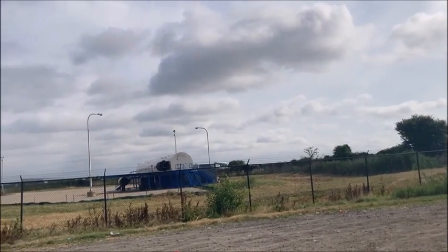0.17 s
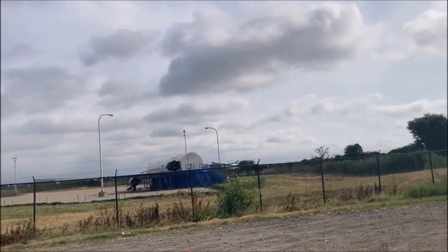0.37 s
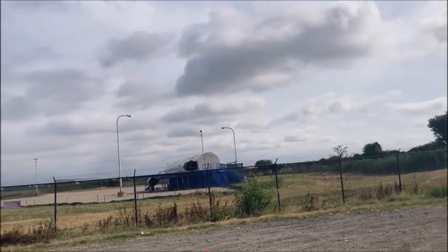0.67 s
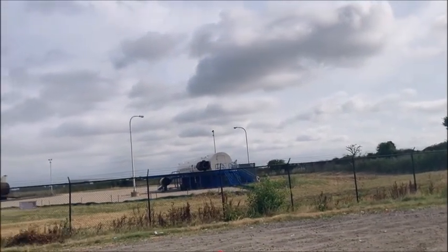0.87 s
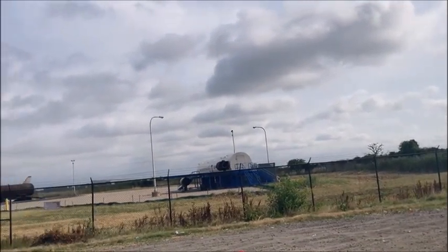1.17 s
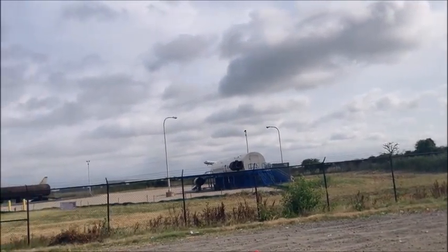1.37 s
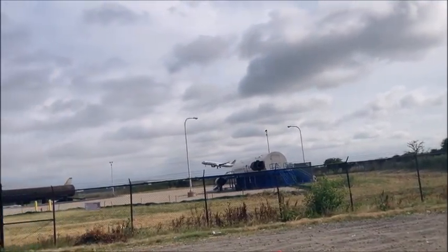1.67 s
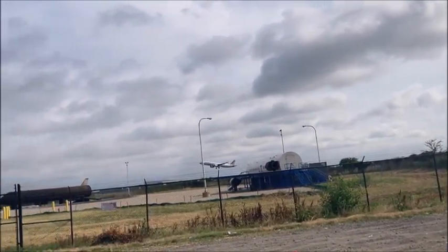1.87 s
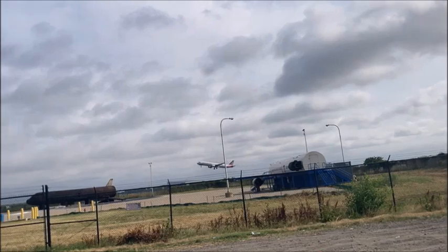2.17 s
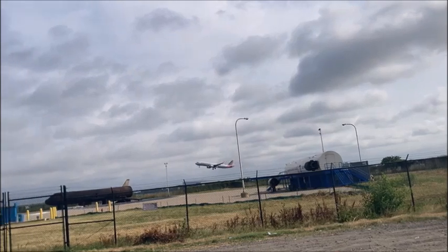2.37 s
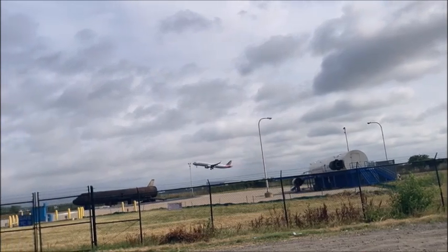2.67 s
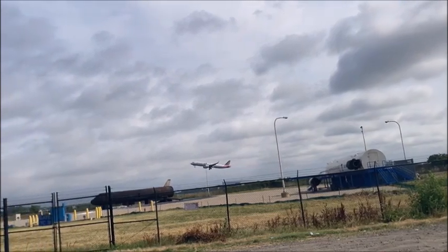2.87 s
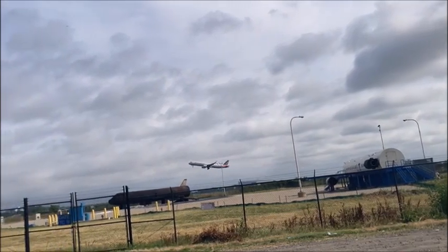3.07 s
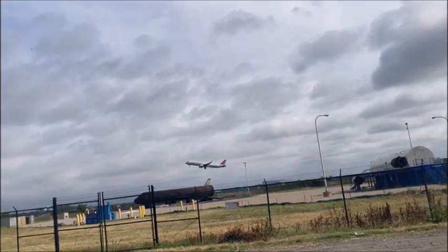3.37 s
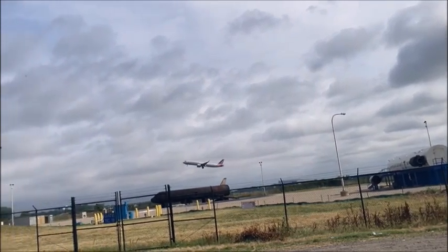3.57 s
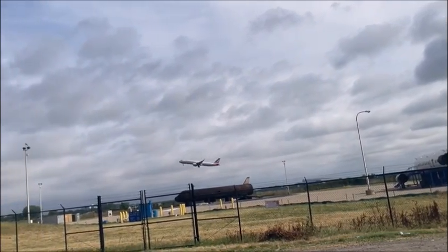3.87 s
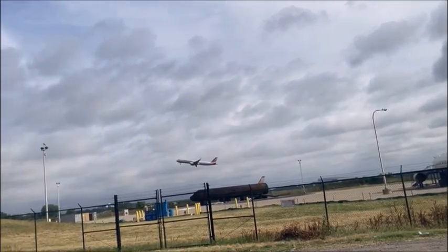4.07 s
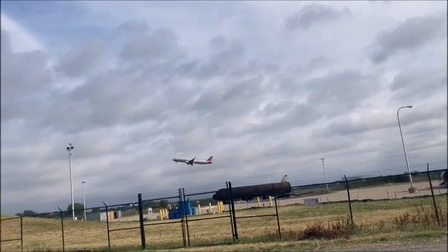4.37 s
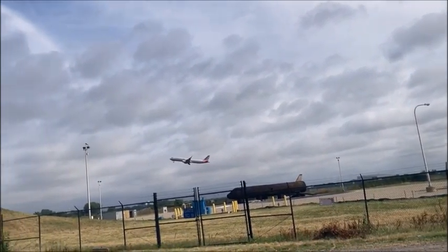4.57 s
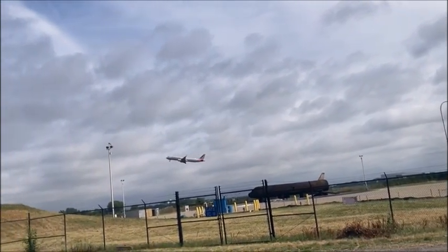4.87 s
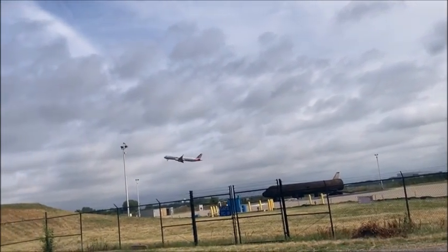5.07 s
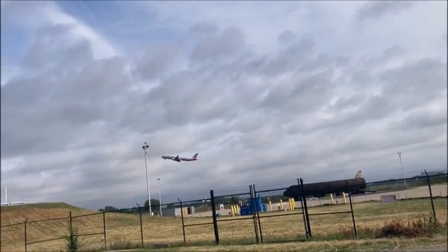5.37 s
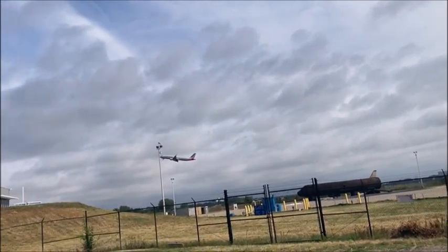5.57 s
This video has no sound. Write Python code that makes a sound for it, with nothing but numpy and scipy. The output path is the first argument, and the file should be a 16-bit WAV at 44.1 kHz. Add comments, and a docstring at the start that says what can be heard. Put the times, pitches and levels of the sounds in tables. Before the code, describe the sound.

Outdoors by an open airfield, a handheld stereo microphone picks up soft distant jet rumble and a blurred whine. A truck accelerates through two gears while a bird gives a quick falling whistle. Wind thumps the microphone from about 1.4 seconds. After 3 seconds the jet roar swells and brightens in uneven surges, its whine sinking in pitch, with a faint high turbine whistle to the end.

```python
"""A twin-engined airliner climbs away from a runway, heard across an open airfield on two channels.
Behind jet roar (banded noise) and fan whine (scattered sines), a truck pulls away (exhaust orders), a generator
hums (one sine) and birds call thinly (gliding sines). From about 1.4 s wind thumps the microphone ports
(filtered pulses) over its lumpy low noise. After 3 s the roar swells and brightens in surges, the whine, falling
in pitch throughout, stands out, and a high turbine whistle (scattered sine) joins it to the end."""
import sys
import numpy as np
from scipy import signal
from scipy.fft import rfft, irfft
from scipy.io import wavfile

SR = 44100
rng = np.random.default_rng(int(sys.argv[2]) if len(sys.argv) > 2 else 0)


def unload_wav(signal):
    """Save mono or channel-first audio to the path in sys.argv[1] as 16-bit WAV at rate SR, clipped to [-1, 1]."""
    wavfile.write(
        sys.argv[1],
        SR,
        np.round(np.clip(np.atleast_2d(signal).T, -1, 1) * 32767).astype(np.int16),
    )


def elevation(decibels):
    """Turn decibel levels (scalar or array-like) into linear amplitude ratios."""
    levels = np.asarray(decibels, float)
    return 10 ** (levels / 20)


N = 251811  # length [samples]


def rms_one(x):
    """Normalisation: scales a signal to unit root-mean-square."""
    return x / np.sqrt(np.mean(np.abs(x) ** 2) + 1e-20)


def in_time(rows):
    """Linear interpolation: columns of a time table become sample-rate curves."""
    s, *columns = np.transpose(rows)
    return [np.interp(np.arange(N) / SR, s, c) for c in columns]


def at_hz(points, hz):
    """Logarithmic interpolation: columns of a frequency table are read on a log-frequency axis."""
    f, *columns = np.transpose(points)
    return [np.interp(np.log(hz + 1), np.log(f), c) for c in columns]


def bump(s, half_s):
    """Gaussian envelope: a bell in time of height 1."""
    return np.exp(-.5 * ((np.arange(N) / SR - s) / half_s) ** 2)


def drift(rate):
    """Low-passed chance: noise of spread about 1 with little above its rate [Hz], which may change in time."""
    slow = signal.sosfilt(signal.butter(3, .08, output="sos"), rng.standard_normal(24100))[100:]
    # 25 points of the slow noise pass in each period of the rate
    place = np.cumsum(np.broadcast_to(rate, N)) * 25 / SR
    return np.interp(place % 23999, np.arange(24000), rms_one(slow))


def tone(hz, db, smear_hz=0):
    """Scattering by turbulence: gusty air turns part of a sine into a narrow band, more the wider the smear."""
    turn = np.exp(2j * np.pi * np.cumsum(hz) / SR)
    if np.all(smear_hz == 0):
        return elevation(db) * np.sqrt(2) * turn.real  # level is rms
    direct = 1 / (1 + (smear_hz / 15) ** 2)  # share of the power left unscattered
    skirt_width, skirt_share = 3, .2  # [smears], share of the scattered power
    core, skirt = [drift(wide * smear_hz) + 1j * drift(wide * smear_hz) for wide in (1, skirt_width)]
    scattered = np.sqrt(1 - skirt_share) * core + np.sqrt(skirt_share) * skirt
    return elevation(db) * (turn * (np.sqrt(2 * direct) + np.sqrt(1 - direct) * scattered)).real


def in_two_channels(x, other):
    """Partial coherence: phase lead, level offset and a share of unrelated sound set two spectra apart."""
    # differences between the two channels; above about 8 kHz they are nearly opposite:
    # (frequency [Hz], left lead [rad], left over right [dB], likeness [0-1])
    channel_differences = [(30, -0.3, -0.5, .97), (150, -0.25, 0.2, .98), (300, -0.3, 0.5, .99),
                           (450, -0.4, 0.5, .97), (620, -0.35, 1, 0.9), (1000, -0.5, -0.5, 0.88),
                           (1300, -0.8, 1, .85), (1550, -1.4, 2, 0.87), (2300, -1.8, -0.5, 0.8),
                           (2650, -1.6, -1, .55), (3100, -2.1, -3, 0.55), (3400, -.8, -6.5, .4),
                           (3750, 0, -2.5, .75), (4700, -0.5, -1, .75), (5100, -1.3, 2, .5),
                           (5340, -2.5, -1, .6), (6030, -3.5, 2, .7), (7160, -6.5, 3.5, 0.8),
                           (7640, -7.5, 0.5, 0.3), (7940, -7.5, -1, 0.1), (8160, -8.5, 0, 1),
                           (10150, -10.5, -1.5, 1), (10700, -12, 10, 1)]
    lead, pan_db, alike = at_hz(channel_differences, np.fft.rfftfreq(N, 1 / SR))
    alike = np.clip(alike, 0, 1)
    side = np.array([[1], [-1]])  # left, right
    common = np.sqrt((1 + alike) / 2) * rfft(x)
    unrelated = np.sqrt((1 - alike) / 2) * rfft(other) * side
    return (common + unrelated) * elevation(side * pan_db / 2) * np.exp(.5j * side * lead)


def roar():
    """Turbulent mixing noise: third-octave bands of noise; gusty air swells neighbouring bands together."""
    # spectral colour before the band gains: (frequency [Hz], relative density [dB])
    colour = [(22, -37.5), (32, -12), (70, 4.5), (150, -9), (190, -17.5), (260, -17.5), (320, -17),
              (400, -19), (520, -20), (1000, -19), (2200, -18), (2600, -26), (3080, -32), (3900, -28),
              (4900, -31), (5500, -34), (7500, -41), (9500, -60.5), (11500, -77), (14000, -99)]
    # growth as the aircraft draws level, for a register that takes all of it: (time [s], swell [dB])
    approach = [(0, -17), (.15, -18.5), (1, -17), (1.5, -17), (2, -15), (2.7, -14), (3.1, -9.5), (3.3, -7),
                (3.58, -3.5), (3.7, 0), (4, 2.5), (4.12, 0.5), (4.4, -3), (4.55, -3), (4.9, -2),
                (5.25, 2.5), (5.46, -0.5), (5.71, -3)]
    # part of that growth which each register takes: (frequency [Hz], share [0-1])
    register_share = [(70, 0.32), (130, 0.34), (240, 0.48), (1100, 0.83), (2900, 0.89), (6300, 1)]
    # rises and (negative) lulls of one register, in the jet noise or, low down near 1.4-1.6 s,
    # probably wind gusts:
    # (time [s], half length [s], rise at the centre [dB], centre [Hz], half width [octaves])
    register_changes = [(.1, 0.29, 7.5, 187, 0.32), (0.56, 0.095, 1, 81, 0.73), (3.7, 0.18, 4, 940, 0.38),
                        (5.9, 0.26, 1.5, 260, 0.38), (2.06, 0.053, -5, 110, 0.76),
                        (1.402, 0.047, 8, 97, 0.74), (1.5, 0.063, 7, 170, 0.71),
                        (1.594, 0.041, 9.5, 95, 0.6), (2, 0.063, 5, 90, 1), (2.08, 0.15, 5.5, 420, 0.29),
                        (3.2, 0.11, -0.5, 43, 0.43), (2.785, 0.15, 6.5, 310, 0.17),
                        (3.48, 0.12, 4, 290, 0.29), (3.7, 0.38, 3, 1940, 0.17), (3.794, 0.043, 8, 300, .6),
                        (3.9, 0.069, 3, 69.4, 0.41), (3.987, 0.083, 8, 290, 0.42),
                        (4.24, 0.57, 6, 178, 0.78), (3.535, 0.094, 5, 150, 0.76),
                        (4.04, 0.11, -2.5, 58, 0.28), (3.95, 0.41, 3.5, 160, 0.26),
                        (5.1, .6, 2, 660, 0.094), (5.44, .05, 6.5, 640, 0.13), (3.02, .07, -3.5, 5600, 0.9),
                        (4.61, 0.28, 5, 288, 0.31), (5.045, 0.27, 7, 134, 0.67), (5.4, 0.3, 2.5, 76, 0.41),
                        (5.47, 0.087, 6.5, 1200, 0.93), (5.45, .05, 7.5, 1420, 0.18),
                        (3.78, 0.018, 9, 1820, 0.25), (5.35, 0.17, 2.5, 2400, 0.25),
                        (3.95, 0.038, 4.5, 1730, 0.37), (4.55, 0.047, 5, 1000, .5)]
    # far air absorbs treble: loss at the start at and above haze_hz, gone after clearing_s
    haze_db, haze_hz, clearing_s = 11, 6100, 3.3
    near_db, flicker_db = 1.06, 1.05  # spread of the linked and of the separate band flicker

    hz = np.fft.rfftfreq(N, 1 / SR)
    noise = in_two_channels(*rng.standard_normal((2, N))) * elevation(at_hz(colour, hz)[0])
    swell_db, = in_time(approach)
    far = np.clip(1 - np.arange(N) / SR / clearing_s, 0, 1)
    changes_db = np.array([db * bump(s, half_s) for s, half_s, db, *_ in register_changes])
    change_hz, change_octaves = np.transpose(register_changes)[-2:]
    out, near = 0, drift(8.0)
    for centre in 25 * 2 ** np.arange(0, 9.2, 1 / 3):
        away = np.clip(3 * np.log2((hz + 1) / centre), -1, 1)  # [third octaves]
        band = irfft(noise * np.cos(away * np.pi / 2) ** 2, N)
        reach = np.exp(-.5 * (np.log2(centre / change_hz) / change_octaves) ** 2)
        absorbed_db = haze_db * far * min(centre / haze_hz, 1) ** 2
        level_db = at_hz(register_share, centre)[0] * swell_db + reach @ changes_db - absorbed_db
        near = .8 * near + .6 * drift(9.0)  # partly inherited from the band below
        gain_db = level_db + near_db * near + flicker_db * drift(30.0)
        out = out + elevation(gain_db) * band
    return out


def fan_whine():
    """Blade-passing harmonics: a fan sounds at multiples of its blade rate, the higher ones smeared wider."""
    # (time [s], mean blade-passing pitch [Hz], smear from turbulent air [Hz],
    #  second harmonic before flares [dB], third harmonic [dB])
    blade_passing = [(0, 1257, 38.7, -63.5, -76), (1, 1238, 35.9, -66, -73), (2, 1181, 25.4, -63.5, -67),
                     (2.7, 1167, 26, -56, -65.5), (3.1, 1130, 26.6, -53.5, -64),
                     (3.35, 1118, 22.6, -52, -62), (3.7, 1090, 13, -51, -57.5), (4.15, 1063, 9, -47, -57),
                     (4.5, 1021, 6.98, -52.5, -61), (5.2, 984, 8, -50.5, -68),
                     (5.45, 979.6, 8.07, -52, -60), (5.71, 952, 9, -55, -61)]
    # first harmonic, fading in and out on the path: (time [s], level [dB])
    first_harmonic = [(0, -49.5), (.6, -50), (.68, -52.5), (.8, -47.5), (.95, -53.5), (1.12, -51),
                      (1.27, -44), (1.42, -48.5), (1.57, -46.5), (1.68, -53.5), (1.95, -48), (2.25, -49),
                      (2.55, -54.5), (2.75, -47.5), (3.05, -49.5), (3.45, -52), (3.55, -47.5), (3.7, -37.5),
                      (3.8, -43.5), (4.15, -43.5), (4.24, -67), (4.34, -47.5), (4.58, -44), (4.68, -67),
                      (4.92, -51.5), (5.1, -40), (5.22, -46), (5.31, -38.5), (5.37, -45.5), (5.44, -30),
                      (5.52, -44.5), (5.6, -37), (5.71, -46.5)]
    # second harmonic flaring up: (time [s], half length [s], rise [dB])
    flares = [(3.35, 0.037, 11.5), (3.792, 0.027, 9), (4.178, 0.092, 6.5), (4.83, 0.05, 12),
              (5.089, .02, 13)]
    waver_hz = 5  # spread of the pitch, made unsteady by the air path

    hz, smear_hz, second_db, upper_db = in_time(blade_passing)
    second_db = second_db + sum(db * bump(s, half_s) for s, half_s, db in flares)
    hz = hz + waver_hz * drift(9.0)
    smear_hz = np.clip(smear_hz, 2, 200)
    first = tone(hz, in_time(first_harmonic)[0], smear_hz)
    second = tone(2 * hz, second_db, 1.2 * smear_hz + 6)
    third = tone(3 * hz, upper_db, 2 * smear_hz + 8)
    fourth = tone(4 * hz, upper_db - 1.5, 2.8 * smear_hz + 10)
    return first + second + third + fourth


def turbine_whistle():
    """Rotor tone: one high sine, scattered by the air into a band."""
    # (time [s], pitch [Hz], level [dB])
    whistle_track = [(3.3, 8770, -130), (3.7, 8870, -79.5), (4.5, 8210, -67.5), (5, 8130, -62),
                     (5.45, 8020, -61), (5.71, 8220, -71)]
    return tone(*in_time(whistle_track), 150)


def engine_tones():
    """Superposition: the fan harmonics and the turbine whistle add."""
    return fan_whine() + turbine_whistle()


def truck():
    """Engine orders: exhaust pulses sound at multiples of a note that climbs in each gear, slightly unsteady."""
    # accelerating through two gears:
    # (start [s], end [s], first exhaust note [Hz], last exhaust note [Hz], reference level [dB])
    gears = [(0, 1.26, 89.3, 168.6, -46.5), (1.358, 2.62, 87.9, 128.6, -49.5)]
    # (multiple of the exhaust note, level over the reference [dB])
    orders = [(1, 1.5), (5, -34.5)]
    t, out = np.arange(N) / SR, 0
    for start, end, from_hz, to_hz, level_db in gears:
        hz = np.interp(t, [start, end], [from_hz, to_hz])
        pull = np.clip(np.minimum((t - start) / 2, end - t) / 0.12, 0, 1)  # 0.24 s rise, 0.12 s fall
        out = out + pull * sum(tone(k * hz, level_db + db + 0.66 * drift(5.2)) for k, db in orders)
    return out


def generator():
    """Periodic machine vibration: a low sine wandering in pitch and level."""
    # (time [s], pitch [Hz], mean level [dB])
    hum_track = [(0, 36.4, -39.5), (1.2, 37.25, -43), (2.4, 37.14, -46), (3.2, 38.07, -45.5),
                 (4.3, 39.2, -50), (4.6, 42.25, -41), (5.2, 40.9, -35), (5.45, 39.5, -42), (5.71, 42, -55)]
    hum_hz, hum_db = in_time(hum_track)
    return tone(hum_hz, hum_db + 1.0 * drift(4.2))


def syllable(start, end, db):
    """Amplitude envelope: a quick onset, a steadily sagging hold and a quick release."""
    edge_s, sag_db_per_s = 0.012, 70
    t = np.arange(N) / SR
    hold = elevation(db - sag_db_per_s * np.clip(t - start, 0, 1))
    return hold * np.clip(np.minimum(t - start, end - t) / edge_s, 0, 1)


def falling_whistle():
    """Near-sine phonation: a pitch relaxing exponentially to rest, with weak second and third harmonics."""
    # syllables: (start [s], end [s], level at onset [dB], second harmonic over the first [dB])
    syllables = [(0.175, 0.218, -56, -48), (.205, .255, -63, -44), (0.244, 0.297, -56, -46),
                 (0.305, 0.41, -53.5, -40), (0.39, .465, -66, -22), (0.454, 0.544, -54.5, -38)]
    from_hz, rest_hz, from_s, sink_s = 5130, 3900, .18, .115  # from_hz is passed at from_s
    t = np.arange(N) / SR
    hz = rest_hz + (from_hz - rest_hz) * np.exp((from_s - t) / sink_s)
    body = sum(syllable(start, end, db) for start, end, db, _ in syllables)
    edge = sum(syllable(start, end, db + over_db) for start, end, db, over_db in syllables)
    return body * tone(hz, 1.6 * drift(40.0)) + edge * (tone(2 * hz, 0) + tone(3 * hz, 5))


def peeps():
    """Linear chirps: smaller birds' thin high sines, gliding under bell-shaped envelopes."""
    # (time [s], half length [s], pitch at that time [Hz], glide [Hz/s], level at the top [dB])
    calls = [(.51, 0.045, 7800, -1200, -83.5), (0.778, 0.028, 7640, 1500, -85),
             (.84, 0.062, 6380, 1800, -85)]
    t = np.arange(N) / SR
    return sum(bump(s, half_s) * tone(hz + glide * (t - s), db) for s, half_s, hz, glide, db in calls)


def birds():
    """Time and level difference between ports: the right one hears the calls later, yet louder."""
    call = falling_whistle() + peeps()
    return np.array([call, np.roll(call, 5) * elevation(4)])  # five samples, 4 dB


def wind():
    """Flow noise at the ports: lumpy low-frequency noise, independent at each port."""
    # (time [s], mean level [dB])
    wind_level = [(0, -55.5), (1.3, -49), (1.6, -44.5), (2, -45.5), (2.5, -45), (3.05, -48), (3.3, -39),
                  (3.45, -55.5), (4.1, -52), (4.5, -55), (4.75, -49), (5.2, -58), (5.71, -65)]
    band = signal.butter(2, [38, 140], "band", fs=SR, output="sos")
    low = signal.sosfilt(band, rng.standard_normal((2, N)))
    lumps_db = 2.0 * np.array([drift(6.4), drift(4.1)])
    return elevation(in_time(wind_level)[0] + lumps_db) * rms_one(low)


def buffets():
    """Impulse response: single pushes of alternating sign ring a low band-pass, alike at both ports."""
    # (time [s], peak of the single thump [dB])
    thumps = [(1.37, -30), (1.415, -35), (1.452, -35), (1.495, -30), (1.527, -31.5), (1.574, -33),
              (1.748, -35), (1.822, -32.5), (1.912, -47), (1.943, -28.5), (2.142, -45), (2.31, -32),
              (3.299, -37), (3.398, -44)]
    s, peak_db = np.transpose(thumps)
    band = signal.butter(3, [65, 300], "band", fs=SR, output="sos")
    thump = signal.sosfilt(band, signal.unit_impulse(SR // 10))
    pushes = np.zeros(N)
    pushes[(s * SR).astype(int)] = elevation(peak_db) * (-1) ** np.arange(len(s))
    return signal.fftconvolve(pushes, thump / np.abs(thump).max())[:N]


def self_noise():
    """Electronic noise: the recorder's faint steady high-passed hiss, independent in each channel."""
    treble = signal.butter(2, 7800, "high", fs=SR, output="sos")
    return elevation(-82.0) * rms_one(signal.sosfilt(treble, rng.standard_normal((2, N))))


def scene():
    """Superposition: aircraft, ground traffic, birds and wind add in the two channels."""
    # two draws of the tones: the channels share only part of the scattering
    tones = irfft(in_two_channels(engine_tones(), engine_tones()), N)
    aircraft = elevation(-9.0) * roar() + tones
    return aircraft + truck() + generator() + birds() + wind() + buffets()


def band_limit(x):
    """A steep low-pass at the top of the band."""
    return signal.sosfilt(signal.butter(12, 14400, fs=SR, output="sos"), x)


def record(dry):
    """Mid/side stereo: the recorder keeps bass mono below a crossover that slides down after the start."""
    start_hz, rest_hz, slide_s = 330, 36, 0.92
    ends = np.clip(np.minimum(np.arange(N), np.arange(N)[::-1]) / (.004 * SR), 0, 1)  # 4 ms fades, no click
    dry = (dry + self_noise()) * ends
    mid, side = (dry[0] + dry[1]) / 2, (dry[0] - dry[1]) / 2
    hz, s, frames = signal.stft(side, SR, nperseg=2048)
    crossover = rest_hz + (start_hz - rest_hz) * np.exp(-.5 * (s / slide_s) ** 2)
    frames = frames / (1 + (crossover / (hz[:, None] + 1)) ** 12.0)
    side = signal.istft(frames, SR, nperseg=2048)[1][:N]
    return band_limit(np.array([mid + side, mid - side]))


dry = scene()
out = record(dry)
unload_wav(out)
```